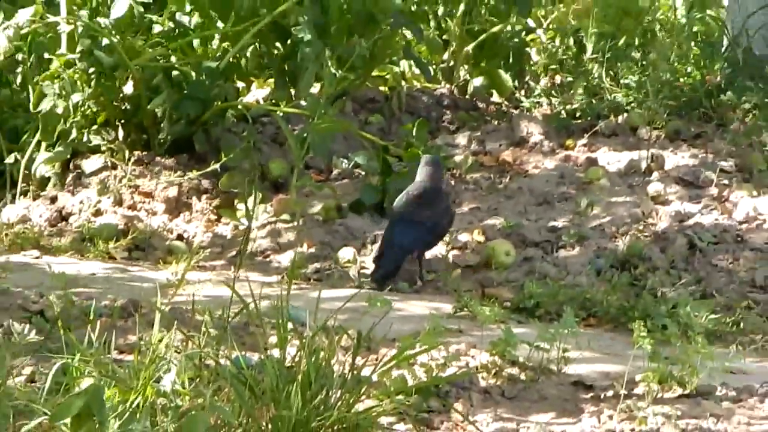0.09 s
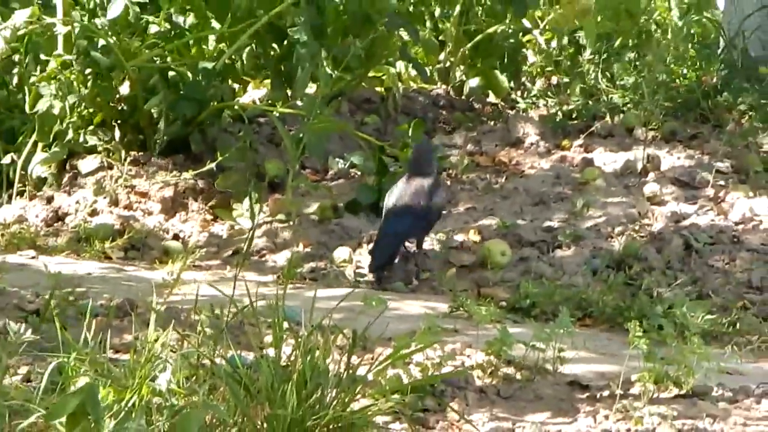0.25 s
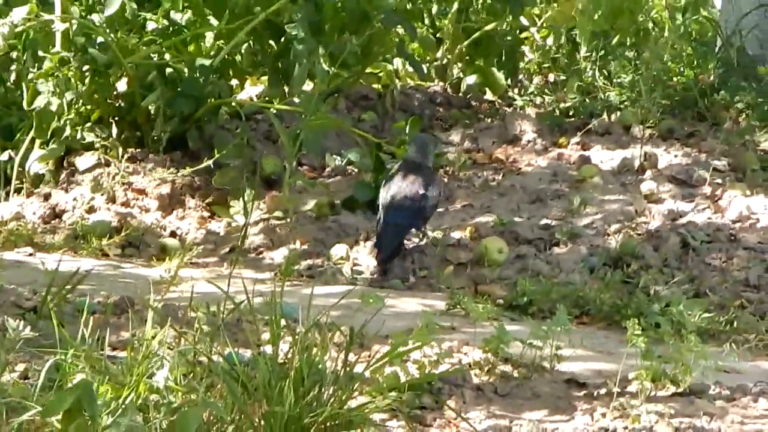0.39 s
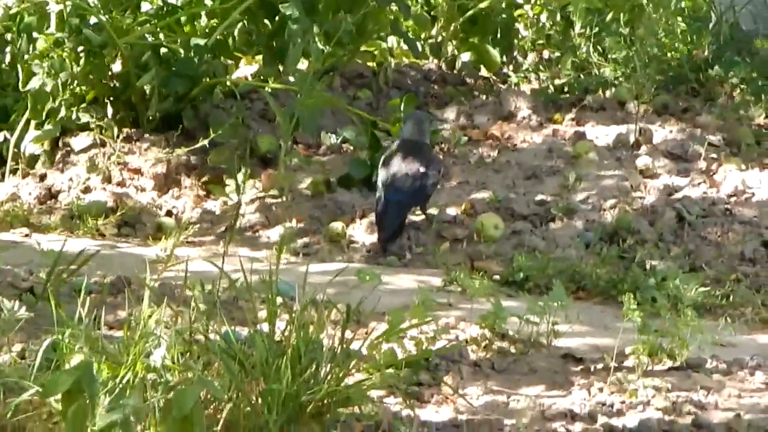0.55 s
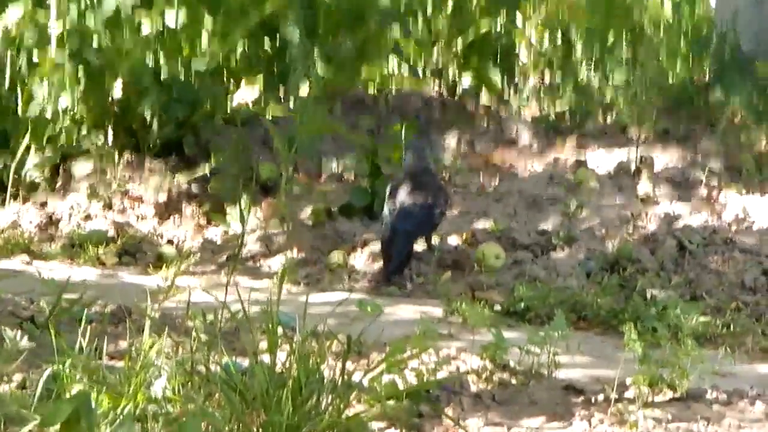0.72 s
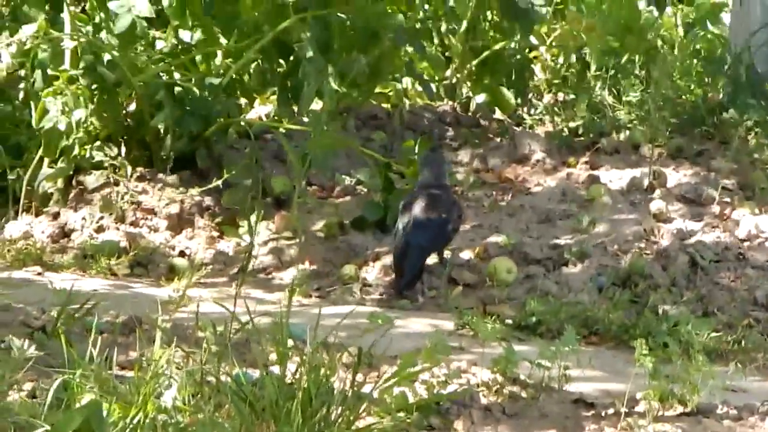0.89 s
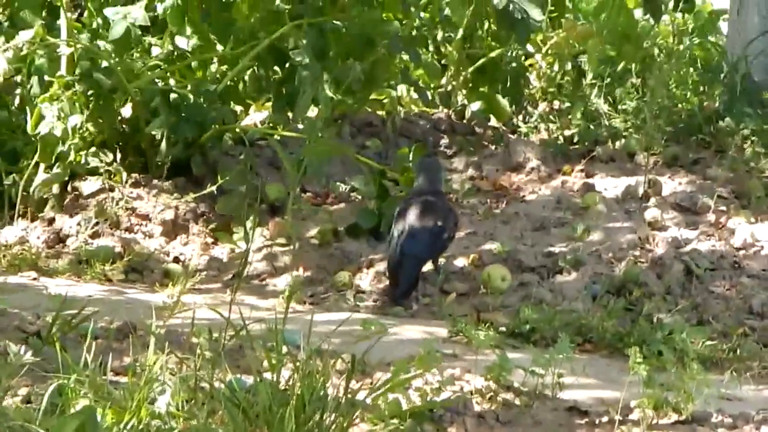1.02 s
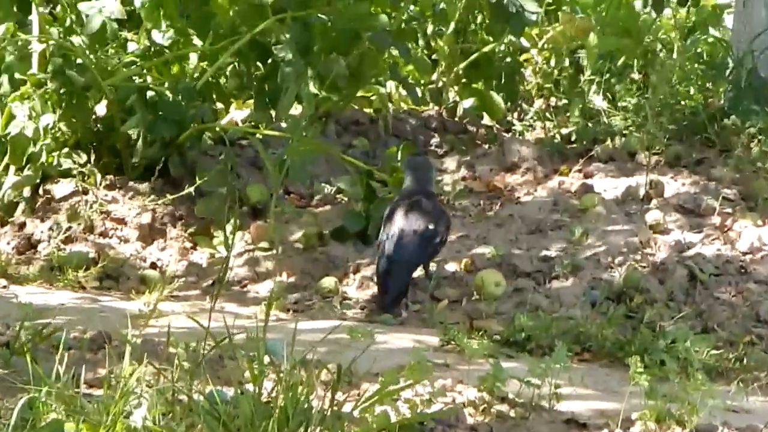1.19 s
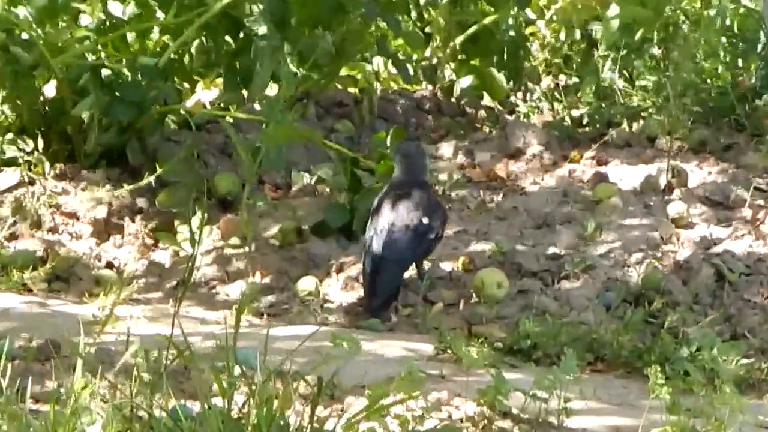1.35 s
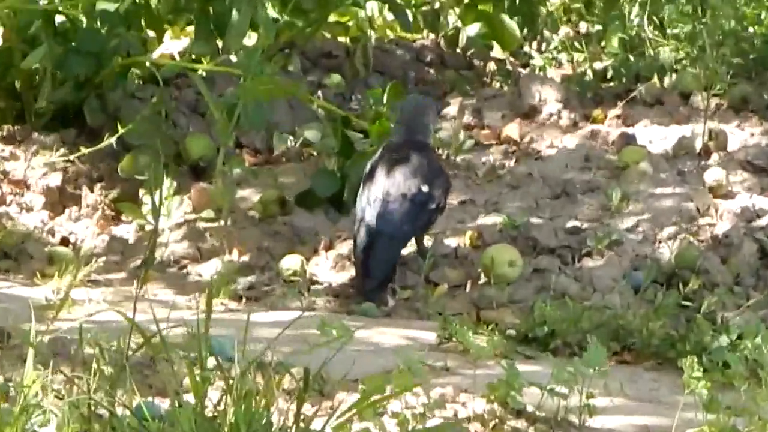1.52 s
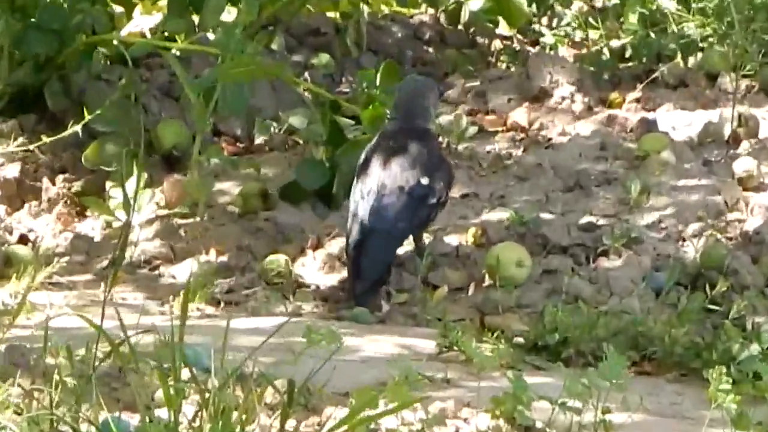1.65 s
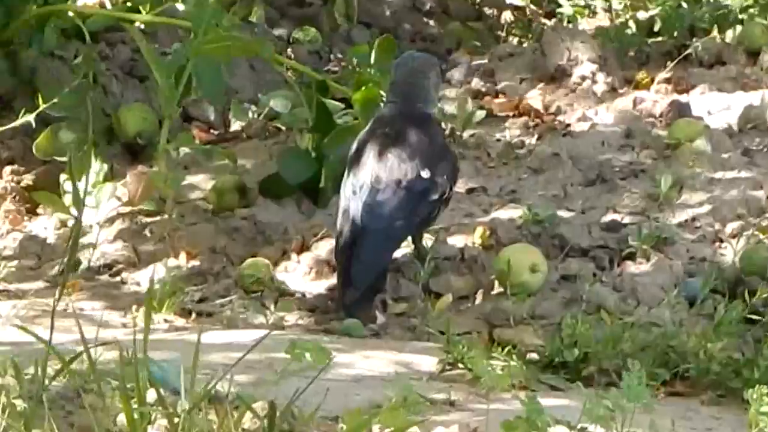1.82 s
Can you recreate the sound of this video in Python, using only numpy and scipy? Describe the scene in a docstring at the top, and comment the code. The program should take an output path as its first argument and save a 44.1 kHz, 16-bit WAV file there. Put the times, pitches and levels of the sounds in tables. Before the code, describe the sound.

Fingers knock and tick on a hand-held camera's plastic shell over faint garden and traffic noise

```python
"""A garden: fingers tick and knock the plastic shell of a hand-held camera, which rings briefly at both microphones.
Each contact is a tap and a short rattle that set off the shell's fading tones; two are soft rustles.
Behind them far traffic rumbles and hisses and leaves rustle, all made from coloured noise.
A cricket trills faintly, made from short tone pulses. Gain control turns the level down after loud peaks."""
import sys
import numpy as np
from scipy import signal
from scipy.fft import rfft, irfft, next_fast_len
from scipy.io import wavfile
from scipy.ndimage import uniform_filter1d, minimum_filter1d, map_coordinates

SR = 44100
rng = np.random.default_rng(int(sys.argv[2]) if len(sys.argv) > 2 else 0)


def decibels_to_gain(level_db):
    """Convert a level in decibels to a linear amplitude gain (20 dB per decade)."""
    exponent = np.asarray(level_db, float) / 20
    return 10 ** exponent


def wav_record(signal):
    """Record a signal, one row per channel, as 16-bit PCM in the file named by sys.argv[1]."""
    frames = np.transpose(np.atleast_2d(signal))
    bounded = np.clip(frames, -1, 1)
    # unit amplitude maps onto the largest positive 16-bit level
    quanta = np.round(bounded * 32767).astype(np.int16)
    wavfile.write(sys.argv[1], SR, quanta)


N = 83790  # length of the scene in samples

# Finger contacts and two soft rustles (the first and last rows). Each row: start in seconds,
# five forces in dB on the tones near each of FORCE_HZ, time in seconds for the rattle to fade by 20 dB.
KNOCKS = [(.032, -64, -57, -42, -38, -46, .02), (.2078, -41, -34.5, -34, -27, -19.5, 0.0013),
          (.292, -45, -23.5, -11, -15.5, -9.5, 0.0022), (0.4708, -42, -34, -52, -53, -48, .003),
          (0.517, -45.5, -38.5, -25.5, -36, -28.5, 0.0018), (0.5601, -70, -45, -30.5, -33, -21.5, 0.0024),
          (0.5863, -49, -41, -32.5, -31.5, -20.5, 0.0028), (0.598, -43, -33, -34, -52, -43, 0.0048),
          (0.6477, -37, -37.5, -32, -51, -46, 0.0054), (0.6532, -46, -32, -54, -34, -42, 0.0044),
          (0.6708, -42, -55, -40, -46, -46, 0.0049), (0.6742, -26.5, -27.5, -49, -29, -33, 0.0014),
          (0.676, -45, -44, -25.5, -54, -46, 0.0035), (0.6835, -31.5, -21.5, -68, -34, -44, 0.00067),
          (.6876, -38, -34, -23, -37, -35.5, 0.0033), (.69, -32, -26.5, -26.5, -40, -41, 0.001),
          (0.8679, -64, -65, -36.5, -33.5, -36.5, 0.0014), (0.8737, -53, -58, -50, -49, -39, 0.0012),
          (0.877, -60, -44, -58, -33, -59, .004), (0.99, -60, -46, -40, -64, -31.5, 0.00071),
          (1.002, -41, -26, -34, -35.5, -58, 0.0012), (1.0038, -31, -32, -51, -38, -51, 0.0014),
          (1.168, -61, -55, -54, -44, -55, 0.025)]
# Where along the pitch range the five forces apply, in Hz.
FORCE_HZ = 150, 600, 1300, 2300, 4500
# Tones of the shell. Each row: pitch in Hz, time to fade by 60 dB in seconds, left level in dB,
# right level in dB, radians by which left leads.
SHELL_MODES = [(127, 0.034, -14, 1.5, 0.1), (221, 0.027, -10, 5, 0.12), (587, 0.033, -11.5, 1, 0.1),
               (822, 0.012, -2.5, 4, 0.8), (1257, 0.023, -2.5, 2, 0.54), (1716, 0.01, 0.5, 4.5, 0.82),
               (2004, 0.034, -4, -5, 0.26), (2227, 0.027, -3.5, -11, 0.72), (2825, 0.021, -2.5, -5, 1.7),
               (3380, 0.011, -5, -11.5, 0.62), (3810, 0.015, -6.5, -2, 1.97), (4320, 0.01, -4, -7.5, 0.57),
               (4875, 0.018, -5.5, -10, 1.9), (5053, 0.021, -4.5, -10, 0.63), (5400, 0.0057, 3, 6, 1.16),
               (6460, 0.0088, -17, -17.5, 1), (7310, 0.014, -14.5, -15.5, 2.16),
               (8200, 0.018, -24, -23, 1.1), (9500, 0.0017, -26, -36, 2), (10970, 0.011, -23, -21, 1.6)]
# Loudness of the far rumble over time. Each row: time in seconds, level in dB before a fixed lift.
RUMBLE_LEVEL = [(0.0, -55), (0.37, -50.5), (0.412, -48.5), (0.444, -54), (0.656, -50), (0.682, -45),
                (0.74, -56.5), (0.766, -49.5), (0.978, -55), (0.994, -51), (1.332, -54), (1.39, -58),
                (1.412, -49.5), (1.576, -55), (1.602, -50), (1.762, -56), (1.782, -50), (1.9, -54)]
# Loudness of the tyre hiss over time. Each row: time in seconds, level in dB before a fixed lift.
ROAD_LEVEL = [(0.0, -52), (0.1, -54), (0.232, -50), (0.502, -48.5), (0.708, -50), (0.898, -51.5),
              (1.19, -52), (1.508, -52), (1.9, -51.5)]
# Loudness of the leaf rustle over time. Each row: time in seconds, level in dB before a slight wobble.
LEAF_LEVEL = [(0, -58.5), (.6, -57.5), (.75, -55.5), (1.1, -58.5), (1.5, -59), (1.9, -58)]
# Loudness of one passing vehicle's hiss. Each row: time in seconds, level in dB.
VEHICLE_LEVEL = [(0, -62), (.95, -64), (1.15, -50), (1.4, -53), (1.55, -54.5), (1.7, -63), (1.9, -80)]
# Colours of the four noises. Each row: frequency in Hz, relative level in dB per Hz.
RUMBLE_COLOUR = [(12, -59), (20, -2), (59, 1), (91, -4.5), (119, -5), (323, -15.5), (353, -32), (400, -19),
                 (520, -15), (880, -120)]
ROAD_COLOUR = [(210, -15), (350, -5.5), (393, -6.5), (462, -28), (544, -4), (611, -8.5), (1270, -1.5),
               (1780, -7.5), (2130, -12), (2510, -7.5), (3000, -20), (3900, -68), (6600, -120)]
LEAF_COLOUR = [(2400, -54), (2900, 1.5), (3600, 2.5), (4700, -3), (5400, 4), (6500, -3.5), (8000, -10),
               (12000, -17), (13000, -42), (22000, -92)]
VEHICLE_COLOUR = [(900, -68), (1500, -1), (1750, -6), (1900, -4), (2050, -29), (3000, -70)]
# How alike left and right are. Each row: frequency in Hz, likeness from 0 to 1.
LIKENESS = [(60, 0.29), (140, 0.36), (350, 0.28), (840, 0.58), (2010, 0.67), (4840, 0.28), (11700, 0.01)]
# Balance of the two sides. Each row: frequency in Hz, left minus right in dB.
BALANCE = [(60, -2.5), (140, -4.5), (350, -2), (840, -4), (2010, 0.5), (4840, -0.5), (11700, -1)]
# Timing of the two sides. Each row: frequency in Hz, radians by which left leads.
LEFT_LEAD = [(60, 0.5), (500, 0.4), (1380, -1.14), (2760, -0.0052), (5770, 0.38), (8000, 1.4)]
# Cricket trills. Each row: start in seconds, length in seconds, level in dB before a fixed lift.
TRILLS = [(0, .08, -58.5), (.33, .12, -58), (0.562, .03, -51.5), (0.66, .08, -53.5), (0.758, .07, -51.5),
          (0.876, .035, -57), (0.922, .035, -52), (0.972, .02, -55), (1.01, .09, -59.5), (1.127, .06, -58),
          (1.55, .09, -55), (1.68, .07, -62.5), (1.788, .11, -61)]

CRICKET_HZ, PULSES_PER_S, PULSE_S, PULSE_SCATTER_DB = 2482, 48, 0.018, 3
MODE_SCATTER_DB = 1.2  # random spread of the force on each tone
RATTLE_SHARE = 0.2  # part of a contact's energy that is rattle
TAPS_PER_S, RISE_S = 3500, 0.00025  # rattle taps per second, time constant of each tone's onset
KNOCK_CUT_HZ = 103  # the knocks carry little below this
NOTCH_HZ, NOTCH_WIDTH_HZ = 3274, 290
DUCK_ABOVE_DB, DUCK_SHARE = -23, 0.35  # threshold, dB turned down per dB above it
DUCK_HOLD_S, RECOVER_DB_PER_S = 0.16, 45.5


def unit(x):
    """Scale to an average (rms) strength of 1."""
    return x / np.sqrt(np.mean(x ** 2) + 1e-20)


def along(points, hz):
    """Read a table of (Hz, value) at any frequency, on a log axis."""
    f, v = np.transpose(points)
    return np.interp(np.log(hz + 1), np.log(f + 1), v)


def curve(rows):
    """Turn a table of (seconds, value) into one value per sample."""
    s, v = np.transpose(rows)
    return np.interp(np.arange(N) / SR, s, v)


def wobble(rate):
    """A smooth random curve through rate random points a second."""
    return map_coordinates(rng.standard_normal(N // 200), [np.arange(N) * rate / SR])


def filtered(x, response):
    """Change the strength and phase of each frequency by a response."""
    m = next_fast_len(N + 8192)
    spectrum = rfft(x, m) * response(np.fft.rfftfreq(m, 1 / SR))
    return irfft(spectrum, m)[..., :N]


def rush(colour, patchy_db):
    """Coloured noise of rms 1 with patches of random gain, as the two microphones hear it."""
    grid = signal.stft(rng.standard_normal((2, N + 512)), nperseg=512)[2]
    patches = uniform_filter1d(rng.standard_normal(grid.shape[1:]), size=5, axis=0)
    patches = uniform_filter1d(patches, size=8, axis=1)
    pair = signal.istft(grid * decibels_to_gain(patchy_db * unit(patches)), nperseg=512)[1][:, :N]

    def colour_and_spread(hz):
        # the angle sets how much the sides share
        angle = np.arccos(np.clip(along(LIKENESS, hz), 0, 1)) / 2
        return decibels_to_gain(along(colour, hz)) * [np.cos(angle), np.sin(angle)]

    def two_sides(hz):
        # left gets half of the difference, right the opposite half
        difference = decibels_to_gain(along(BALANCE, hz)) * np.exp(1j * along(LEFT_LEAD, hz))
        return difference ** np.array([[0.5], [-0.5]])

    mid, side = filtered(pair, colour_and_spread)
    return unit(filtered(np.array([mid + side, mid - side]), two_sides))


def traffic_rumble():
    """Low noise that swells in lumps, partly shared by both sides."""
    lumps_db = 1.1 * wobble(10.28) + 0.5 * np.array([wobble(37), wobble(28)])
    lumpy = unit(decibels_to_gain(lumps_db) * rush(RUMBLE_COLOUR, patchy_db=0.7))
    return decibels_to_gain(curve(RUMBLE_LEVEL) + 4.0) * lumpy


def tyre_hiss():
    """Far tyres make a noise whose level wobbles a little."""
    level_db = curve(ROAD_LEVEL) + 2.5 + 0.44 * wobble(15)
    return decibels_to_gain(level_db) * rush(ROAD_COLOUR, patchy_db=3.0)


def leaf_rustle():
    """Rustling leaves make a high noise whose level wobbles slightly."""
    level_db = curve(LEAF_LEVEL) + 0.27 * wobble(15.45)
    return decibels_to_gain(level_db) * rush(LEAF_COLOUR, patchy_db=1.8)


def passing_vehicle():
    """One vehicle's narrower band of hiss rises and fades."""
    return decibels_to_gain(curve(VEHICLE_LEVEL)) * rush(VEHICLE_COLOUR, patchy_db=1.5)


def cricket():
    """Each trill is a train of soft-edged tone pulses of uneven size."""
    out, t = np.zeros(N + SR), np.arange(SR // 20) / SR
    shape = np.sin(np.pi * np.clip(t / PULSE_S, 0, 1))
    for s, length, db in TRILLS:
        chance = rng.standard_normal((12, 3))
        for k, (size, late, phase) in enumerate(chance):
            pulse_s = k / PULSES_PER_S
            if pulse_s < length:
                start = round(abs(s + pulse_s + 0.0015 * late) * SR)
                tone = np.sin(2 * np.pi * CRICKET_HZ * t + 9 * phase)
                out[start:][:len(t)] += decibels_to_gain(db + 4.5 + PULSE_SCATTER_DB * size) * shape * tone
    return out[:N] * decibels_to_gain([[0.4], [-0.4]])  # slightly louder on the left


def knocks():
    """A tap and its chatter shake the shell, whose tones ring and die away."""
    out, t = np.zeros((2, N + SR)), np.arange(SR // 16) / SR
    hz, t60, left_db, right_db, lead = np.transpose(SHELL_MODES)[:, :, None]
    # upper tones alternate in phase
    sign = np.where(hz > FORCE_HZ[2], (-1.) ** np.arange(len(hz))[:, None], 1)
    rings = []
    for db, side in ((left_db, 1), (right_db, -1)):
        fading = decibels_to_gain(db - 60 * t / t60) * (1 - np.exp(-t / RISE_S))
        rings.append(sign * fading * np.sin(2 * np.pi * hz * t + side * lead / 2))
    rings = np.array(rings)
    ring_size = np.linalg.norm(rings, axis=(0, 2), keepdims=True)
    for s, *force_db, length in KNOCKS:
        # a firm tap at the start, with sparse random taps dying away after it
        taps = rng.standard_normal(len(t)) * (rng.random(len(t)) < TAPS_PER_S / SR) * decibels_to_gain(-20 * t / length)
        taps = np.sqrt(RATTLE_SHARE) * taps / np.linalg.norm(taps)
        taps[0] = np.sqrt(1 - RATTLE_SHARE)
        force = along(list(zip(FORCE_HZ, force_db)), hz) + MODE_SCATTER_DB * rng.standard_normal(hz.shape)
        shaken = signal.fftconvolve(rings, taps[None, None], axes=2)[..., :len(t)]
        # each tone keeps its energy however the taps fall
        same_energy = ring_size / np.linalg.norm(shaken, axis=(0, 2), keepdims=True)
        out[:, round(s * SR):][:, :len(t)] -= np.sum(decibels_to_gain(force) * same_energy * shaken, axis=1)
    return filtered(out[:, :N], lambda f: (1j * f / (KNOCK_CUT_HZ + 1j * f)) ** 2)


def scene():
    """Finger contacts on the shell over the sounds of the garden."""
    fingers = knocks()
    garden = traffic_rumble() + tyre_hiss() + leaf_rustle() + passing_vehicle()
    return fingers + garden + cricket()


def microphone_dip(x):
    """The microphone's response has one narrow dip that removes its centre frequency."""
    def dip(hz):
        width = 1j * hz * NOTCH_WIDTH_HZ
        return 1 - width / (NOTCH_HZ ** 2 - hz ** 2 + width)
    return filtered(x, dip)


def gain_control(x):
    """Peaks above a threshold turn the level down; it holds, then climbs back steadily."""
    peak_db = 20 * np.log10(np.abs(x).max(axis=0) + 1e-9)
    over_db = np.maximum(peak_db - DUCK_ABOVE_DB, 0)
    # hold the lowest gain of the recent past
    hold = round(DUCK_HOLD_S * SR)
    padded_db = np.pad(-DUCK_SHARE * over_db, (hold, 0))
    held_db = minimum_filter1d(padded_db, size=2 * (hold // 2) + 1)[hold // 2:][:N]
    climb_db = RECOVER_DB_PER_S * np.arange(N) / SR
    gain_db = np.minimum.accumulate(held_db - climb_db) + climb_db
    # the gain is delayed by 2 ms and smoothed over 2 ms
    late = SR // 500
    gain_db = uniform_filter1d(np.pad(gain_db, (late, 0))[:N], size=late)
    return x * decibels_to_gain(gain_db)


def roll_off(x):
    """The treble ends steeply here."""
    return signal.sosfilt(signal.butter(12, 12260, fs=SR, output="sos"), x)


def record(dry):
    """The camera hears the scene through its microphone dip and gain control."""
    heard = microphone_dip(dry)
    mix = gain_control(heard)
    return roll_off(mix)


dry = scene()
out = record(dry)
wav_record(out)
```